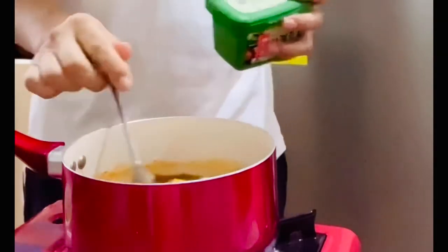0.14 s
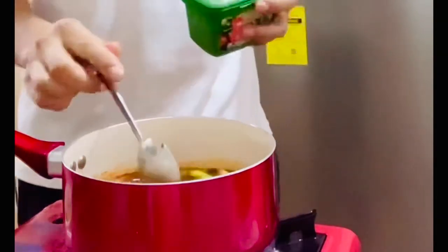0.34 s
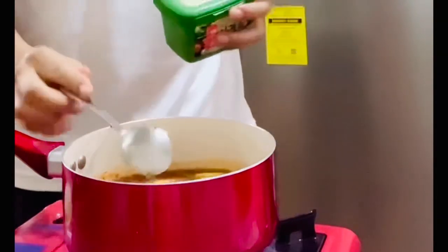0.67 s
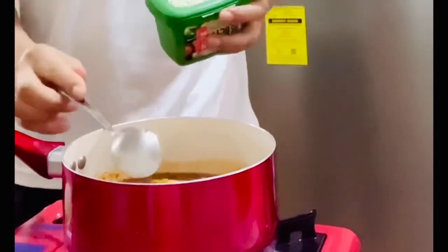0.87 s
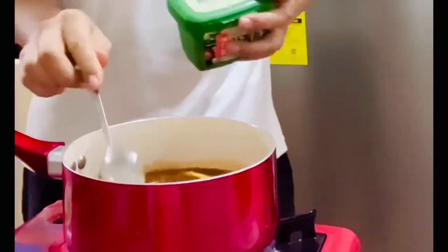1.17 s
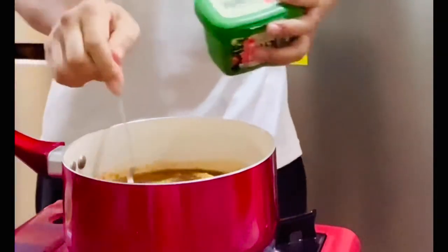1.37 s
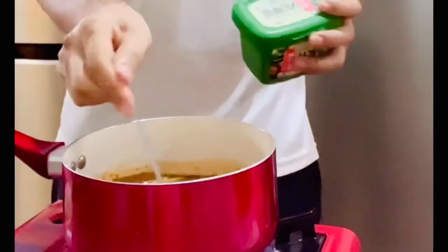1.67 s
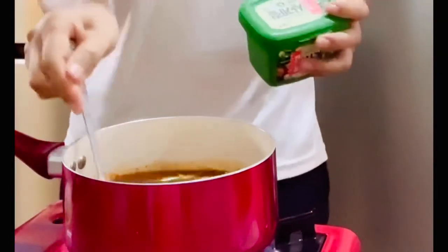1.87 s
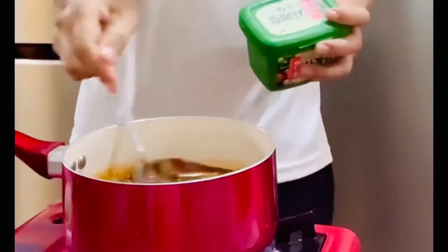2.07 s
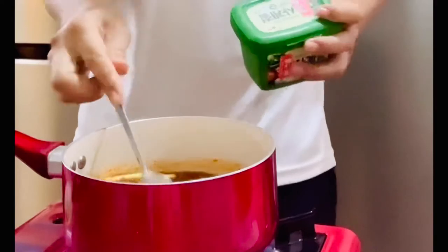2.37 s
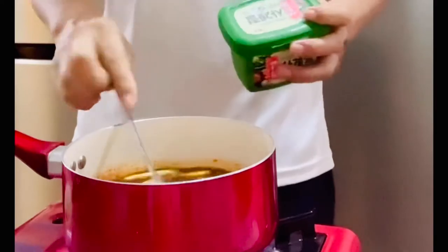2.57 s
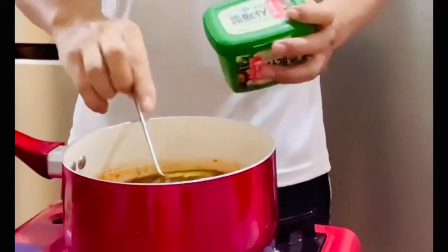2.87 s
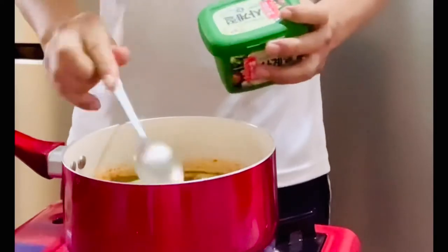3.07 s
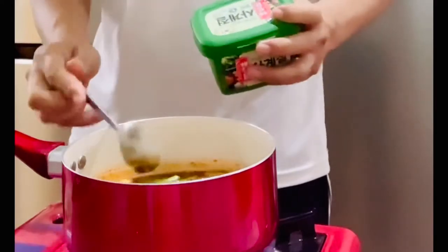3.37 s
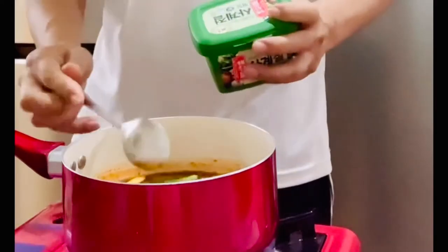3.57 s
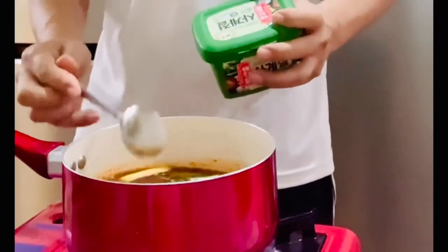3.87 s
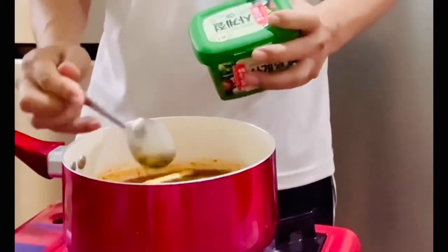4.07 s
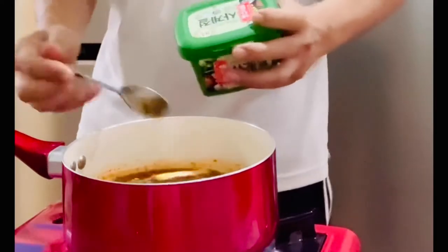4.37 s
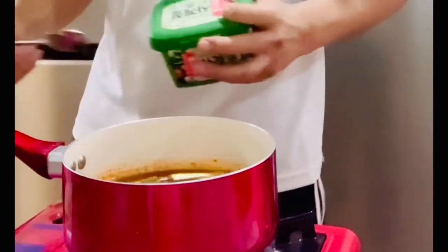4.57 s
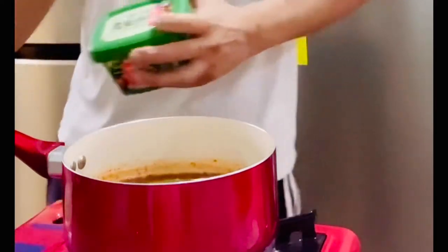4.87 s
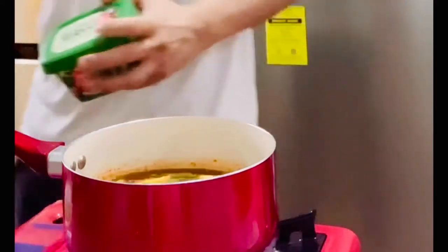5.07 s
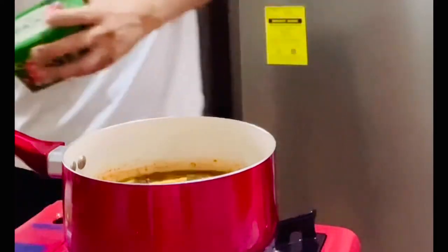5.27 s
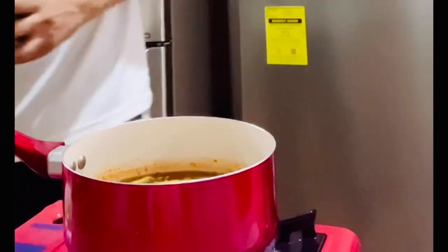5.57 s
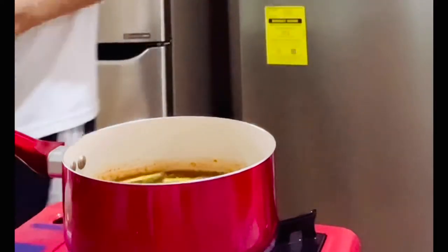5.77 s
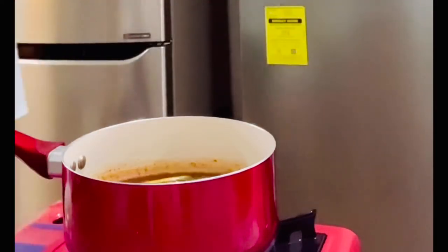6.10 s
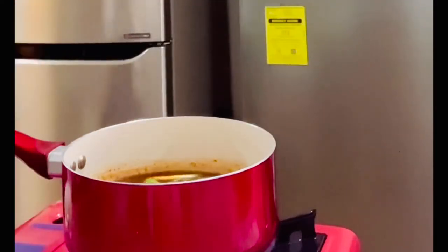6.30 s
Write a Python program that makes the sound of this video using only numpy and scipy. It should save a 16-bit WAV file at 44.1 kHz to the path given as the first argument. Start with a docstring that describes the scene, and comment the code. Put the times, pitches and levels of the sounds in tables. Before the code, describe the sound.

A steel spoon stirs broth and taps against a saucepan, then clatters down onto a kitchen counter and rattles to rest.

```python
"""A steel spoon stirs seasoning paste into a saucepan of broth in a small, hard-walled kitchen.
It clinks on the pan and rubs along the bottom while the broth plops and sizzles, then is tapped clean
six times. Put down on the counter, it bounces and rocks to rest. Each hit is a brief metal chatter plus
ringing modes. Rumble, hiss and mains hum lie underneath; a faint whine and one dull thump come late."""
import sys
import numpy as np
from scipy import signal
from scipy.fft import rfft, irfft, next_fast_len
from scipy.io import wavfile
from scipy.ndimage import uniform_filter1d

SR = 44100
rng = np.random.default_rng(int(sys.argv[2]) if len(sys.argv) > 2 else 0)


def master_out(mix):
    """Clip the mix to full scale and print it as 16-bit PCM to the path in sys.argv[1]."""
    frames = np.transpose(np.atleast_2d(mix))
    ceiling = np.clip(frames, -1, 1)
    pcm = np.round(ceiling * 32767).astype(np.int16)
    wavfile.write(sys.argv[1], SR, pcm)


N = 284004
TIME_S = np.arange(N) / SR
RING_TIME_S = TIME_S[:SR // 3]

# room echo: freq_hz, t60_s, level_db
ROOM_BANDS = [(100, 0.64, 1.5), (416, 0.26, 9), (1550, 0.4, 6.5), (3450, 0.43, 6), (8100, 0.37, 0.5),
              (15500, 0.39, -11)]
# left-right likeness of echo and of air: freq_hz, correlation
ECHO_LIKENESS = [(40, 0.2), (150, -0.029), (500, 0.79), (1000, -0.0099), (4000, -0.26), (7000, 0.51),
                 (12000, 0.91)]
AIR_LIKENESS = [(40, 0.89), (75, 0.96), (130, 0.76), (250, 0.44), (1000, 0.051), (4000, 0.033),
                (7000, 0.92), (12000, 1)]
# right microphone port behind the left: freq_hz, lag_rad
PORT_LAG = [(2000, 0), (3100, .8), (3900, 0), (4550, -.8), (6100, -.1), (7150, 3.14), (7540, 5.4),
            (8100, 7), (8900, 6.3), (11500, 6.3), (13100, 7.2), (15500, 8.7)]
# kitchen air: freq_hz, gain_db
RUMBLE_SPECTRUM = [(12, -49), (20, -10.5), (29, 1.5), (43, -9), (65, 0.5), (90, -18), (129, -6),
                   (258, -14.5), (293, -26), (332, -16.5), (549, -17), (967, -26), (1700, -30.5),
                   (2150, -30.5), (3000, -35.5), (3900, -26.5), (6600, -120)]
HISS_SPECTRUM = [(2000, -20), (3000, -3), (3900, -0.5), (5000, -0.5), (6400, -5), (7150, -2), (8200, -7.5),
                 (9500, 7.5), (11000, 1), (13200, -5), (15500, 0)]
# mains hum: freq_hz, level_db
HUM_TONES = [(60, -54.5), (120, -75)]
# whine: time_s, level_db
WHINE_ENVELOPE = [(5.3, -82), (5.45, -68), (5.72, -86), (6.05, -78), (6.15, -74), (6.26, -73),
                  (6.35, -69.5), (6.44, -67)]

# broth washing up the hot wall: start_s, level_db
SIZZLES = [(1.353, -53), (1.602, -61)]
# sizzle: freq_hz, gain_db
SIZZLE_SPECTRUM = [(1000, -12), (4000, 4), (8000, 5.5), (12000, -2), (14500, -1), (16000, -14)]
# bubbles: start_s, pitch_hz, level_db, broth_db
PLOPS = [(1.031, 776, -31.5, -8), (1.310, 863, -34, -15), (2.319, 783, -28, -21), (2.664, 870, -39, -24)]
# broth under a plop: freq_hz, gain_db, t60_s
BROTH_MODES = [(438, 2.5, 0.081), (273, -9, 0.087), (133, -0.5, 0.15)]
# spoon over the pan bottom: start_s, length_s, pressure_db, resonance_hz, rise_hz_per_s, grit_db
STROKES = [(1.301, 0.017, -47.5, 830, 300, -3), (1.33, 0.25, -55, 904, 50, 0),
           (1.595, 0.017, -56, 907, 400, 4.5), (1.624, 0.11, -56, 892, 404, 0),
           (1.772, 0.047, -55, 790, 900, 3), (1.828, 0.096, -45.5, 824, 1500, -5),
           (2.311, 0.012, -50.5, 797, 300, -1), (2.5, 0.075, -61, 967, 400, -11),
           (2.652, 0.0056, -55.5, 846, 300, -6)]
# resonances under the spoon: freq_hz, glide_share, width_hz, gain_db
RUB_MODES = [(470, .1, 90, -7), (900, 1, 115, -2), (1600, .3, 220, -10)]
# grit under the spoon: freq_hz, gain_db
GRIT_SPECTRUM = [(200, -73), (500, -3), (800, -7), (1300, -7), (2200, 2.5), (2800, -5.5), (3600, 2.5),
                 (5500, -15), (15000, -21)]

# spoon landing on the counter: start_s, level_db, counter_db, steel_db
LANDINGS = [(4.8382, -9.5, -10.5, -13), (4.8400, -9.5, -3.5, -4), (4.921, -15.5, -1.5, -3.5),
            (4.934, -19.5, -10, -9)]
# spoon tipping over: start_s, level_db, steel_db
SLAPS = [(4.948, -22, -12), (4.959, -22, -9), (5.053, -8.5, -7.5), (5.074, -9, -8.5), (5.081, -10, -4.5),
         (5.092, -10.5, -10), (5.099, -19, -2), (5.113, -19, -6), (5.133, -23, -14), (5.167, -13.5, -6),
         (5.186, -19.5, -6)]
# cracks on the counter: freq_hz, gain_db
LANDING_SPECTRUM = [(50, -17), (120, 1.5), (250, -11), (480, 6), (700, -7), (950, 0.5), (1400, -16),
                    (2100, 9), (2500, -5), (3100, -1.5), (3400, -1.5), (4200, 1.5), (5000, -3),
                    (6600, -5.5), (8000, -0.5), (9000, -1.5), (10500, -2), (13300, 0), (14500, 12),
                    (15600, 5.5), (16000, -21)]
ROCK_SPECTRUM = [(90, -5.5), (230, -10.5), (370, -2.5), (750, -10.5), (1350, -14), (2200, -3.5), (3100, -3),
                 (4500, -0.5), (5500, -17), (6100, -13), (7100, -7.5), (8200, -13), (10000, -14),
                 (15500, -14)]
# counter top: freq_hz, gain_db, t60_s
COUNTER_MODES = [(129.6, -27, 0.3), (455, -20, 0.07), (520, -23, 0.1), (2010, -19, 0.11), (2110, -14, 0.05),
                 (3030, -15, 0.05)]
# free spoon, by the side it lands on: freq_hz, on_edge_db, on_bowl_db, t60_s
SPOON_MODES = [(2735, -29, -21, .08), (3058, -13, -17, .05), (3545, -25, -18, .07), (3900, -22, -20, .05),
               (4484, -19, -17, .1), (4670, -24, -22, .13), (6130, -27, -29, .15), (6955, -26, -21, .13),
               (7540, -16, -26, .15), (8091, -15, -16, .15), (8205, -23, -21, .15), (8892, -18, -20, .18),
               (11175, -19, -19, .21), (11552, -24, -23, .24), (12550, -16, -22, .3),
               (13104, -23, -19, .22), (14260, -11, -17, .19), (14326, -13, -19, .22),
               (15470, -8, -27, .09)]

# held spoon hitting the pan: start_s, level_db, bowl_hz, bowl_db, edge_hz, edge_db,
# body_db, tilt_db_per_octave, hollow_db, hard_db, tick_db
TAPS = [(0.267, -34.5, 3880, -17, 5200, -17, -1.5, 1, 0, -3, 6),
        (0.383, -23, 3870, -8, 5230, -8.5, -3, -0.5, 1.5, 3.5, 2.5),
        (0.620, -20.5, 3800, -1.5, 4830, -2, -3, -0.5, 7, 7.5, 9),
        (0.659, -31, 3670, -4, 5650, -8, 0.5, -2, 10, -8, 6),
        (2.320, -32.5, 3900, -30, 4500, -24, -9, -1.5, 4, -1, -9),
        (2.927, -20.5, 3890, -4.5, 4620, -5.5, -1.5, 0.5, -2, 3, 7),
        (3.166, -21, 4005, 6, 5490, 4.5, 1, 1, 3, -7, 13.5),
        (3.369, -20, 4010, 5, 5340, -9.5, 1.5, 1, 2, -9, 1),
        (3.574, -17.5, 3995, 1, 4620, -7, -1, 0.3, 1.5, -9, 2.5),
        (3.7713, -16, 3954, 2, 4370, -6.5, -0.5, 1.6, 0.5, 0.5, 9.5),
        (3.959, -18, 3970, -0.5, 5530, -8.5, -3, -0.1, -3.5, 1, 5.5),
        (3.976, -30, 3960, 0, 5550, -12, -8, -1, -5, 0, 12)]
# first touch and crack of a tap: freq_hz, gain_db
TICK_SPECTRUM = [(1900, -14), (7000, -1.5), (9300, -0.5), (10700, -8), (12900, -4.5), (13900, 1),
                 (16000, -13.5)]
TAP_SPECTRUM = [(70, -32.5), (200, -5), (300, 2), (600, 7), (720, -8), (820, 6.5), (1060, -1.5),
                (1230, 3.5), (1430, -9), (1850, 4.5), (2130, 4.5), (2300, -0.5), (2500, 2), (2650, -7.5),
                (2900, 1.5), (3800, -5), (5000, -10), (5400, -17), (7000, -12), (8500, -11), (10800, -6.5),
                (14000, -16), (16000, -43)]
# held spoon's edge: pitch_ratio, gain_db
EDGE_SPECTRUM = [(.6, -45), (.74, -22), (.79, -6), (.84, -4), (.9, -22), (.97, -3), (1, 1), (1.05, -4),
                 (1.1, -9), (1.15, -4), (1.21, -18), (1.4, -45)]
# held spoon's bowl: pitch_ratio, gain_db, t60_s
BOWL_MODES = [(1, 0, .022), (1.002, -18, .15), (.974, -22, .11)]
# pan full of broth: freq_hz, gain_db, t60_s
PAN_MODES = [(130, -23, .23), (185, -30, .1), (279, -21, .17), (345, -24, .06), (430, -25, .1),
             (485, -25, .13), (556, -24, .09), (824, -25, .03), (1210, -23, .025), (2080, -24, .02),
             (2950, -25, .02), (3640, -27, .05)]


def from_db(db):
    """Decibels to gain."""
    return 10 ** (np.asarray(db) / 20)


def unit_rms(x):
    """Scale to unit rms."""
    return x / np.sqrt(np.mean(x ** 2) + 1e-20)


def at_hz(points, hz):
    """Read a table on a log-frequency axis."""
    f, value = np.transpose(points)
    return np.interp(np.log(np.maximum(hz, 1)), np.log(f), value)


def add(track, start_s, sound):
    """Mix a sound into a track."""
    start = int(start_s * SR)
    track[start:start + len(sound)] += sound[:N - start]


def min_phase(x, gain):
    """Causal filter with the given gain per frequency bin."""
    size = 2 * (gain.shape[-1] - 1)
    cepstrum = irfft(np.log(gain))[..., :size // 2]
    cepstrum[..., 1:] *= 2
    return irfft(rfft(x, size) * np.exp(rfft(cepstrum, size)))[..., :x.shape[-1]]


def colour(x, spectrum, tilt_db_per_octave=0):
    """Tilted filter of unit power gain."""
    size = 2 * next_fast_len(x.shape[-1] // 2 + 2048)
    hz = np.arange(size // 2 + 1) * SR / size
    tilted = [(f, db + tilt_db_per_octave * np.log2(f)) for f, db in spectrum]
    return min_phase(x, unit_rms(from_db(at_hz(tilted, hz))))


def flatten(x, fine_hz, broad_hz):
    """Level a noise burst's chance peaks and holes, so it has no pitch."""
    size = 2 * next_fast_len(x.shape[-1])
    power = np.abs(rfft(x, size)) ** 2
    fine, broad = (uniform_filter1d(power, int(hz * size / SR)) + 1e-12 for hz in (fine_hz, broad_hz))
    return min_phase(x, np.sqrt(broad / fine))


def stereo_noise(likeness, size):
    """White noise pair, correlation set per frequency."""
    mid, side = rfft(rng.standard_normal((2, size)))
    alike = np.clip(at_hz(likeness, np.arange(len(mid)) * SR / size), -1, 1)
    return irfft(np.sqrt(1 + alike) * mid + np.sqrt(1 - alike) * side * [[1], [-1]], size)


def wander(turns_per_s):
    """Random curve, unit rms."""
    turns = rng.standard_normal(int(TIME_S[-1] * turns_per_s) + 2)
    return unit_rms(np.interp(TIME_S * turns_per_s, np.arange(len(turns)), turns))


def resonance(x, hz, width_hz):
    """Movable resonance: a low-pass around a turning phase, unit rms."""
    carrier = np.exp(2j * np.pi * np.cumsum(hz) / SR)
    pole = np.exp(-np.pi * width_hz / SR)
    baseband = signal.lfilter([1], [1, -2 * pole, pole ** 2], x / carrier)
    return unit_rms((baseband * carrier).imag)


def ring(modes, spread_db=2, detune=0):
    """Decaying sines of alternating sign; level and pitch can scatter per blow."""
    scatter = rng.uniform(-1.06, 1, (len(modes), 2))
    out = 0
    for k, ((hz, db, t60_s), (louder, sharper)) in enumerate(zip(modes, scatter)):
        envelope = from_db(db + spread_db * louder - 60 * RING_TIME_S / t60_s)
        out += (-1) ** k * envelope * np.sin(2 * np.pi * hz * (1 + detune * sharper) * RING_TIME_S)
    return out


def crack(spectrum, decay_s, tilt_db_per_octave=0):
    """Metal chatters for a few milliseconds on contact."""
    t = TIME_S[:SR // 20]
    burst = rng.standard_normal(len(t)) * np.sqrt(t) * np.exp(-t / decay_s)
    chatter = flatten(burst, fine_hz=450, broad_hz=8000)
    return colour(chatter / np.linalg.norm(chatter), spectrum, tilt_db_per_octave)


def kitchen_echo(build_s=0.0018, wall_s=0.034, wall_db=-15):
    """Dense reflections dying band by band, plus one slap from a far wall."""
    t = TIME_S[:int(SR * .7)]
    noise = rfft(stereo_noise(ECHO_LIKENESS, len(t)))
    hz = np.arange(len(t) // 2 + 1) * SR / len(t)
    echo = 0
    for band, (_, t60_s, db) in enumerate(ROOM_BANDS):
        share = at_hz([(row[0], k == band) for k, row in enumerate(ROOM_BANDS)], hz)
        fade = from_db(-60 * t / t60_s) * (1 - np.exp(-(t / build_s) ** 2))
        echo += from_db(db) * irfft(noise * share, len(t)) * fade / np.linalg.norm(fade) / np.sqrt(2)
    echo[:, int(wall_s * SR)] += from_db(wall_db)
    return echo


def place(x, echo, wet_db, treble_left_db, split_hz=1200):
    """Direct sound plus room, with the treble panned."""
    paths = from_db(wet_db) * echo
    paths[:, 0] += 1
    stereo = signal.fftconvolve(x[None], flatten(paths, fine_hz=70, broad_hz=700), axes=1)[:, :N]
    bass = signal.sosfilt(signal.butter(1, split_hz, fs=SR, output="sos"), stereo)
    return bass + (stereo - bass) * from_db([[treble_left_db / 2], [-treble_left_db / 2]])


def whine(start_hz=1975, sag_hz_per_s=300, width_hz=25):
    """Narrow noise band sliding down; fades and returns."""
    times_s, levels_db = np.transpose(WHINE_ENVELOPE)
    age_s = TIME_S - times_s[0]
    envelope = (age_s > 0) * from_db(np.interp(TIME_S, times_s, levels_db))
    return envelope * resonance(rng.standard_normal(N), start_hz - sag_hz_per_s * age_s, width_hz)


def background(rumble_db=-52, hiss_db=-62.5):
    """Rumble, hiss, mains hum and whine, slightly left."""
    rumble = from_db(rumble_db) * unit_rms(colour(stereo_noise(AIR_LIKENESS, N), RUMBLE_SPECTRUM))
    hiss = from_db(hiss_db) * unit_rms(colour(stereo_noise(AIR_LIKENESS, N), HISS_SPECTRUM))
    hum = sum(from_db(db) * np.sin(2 * np.pi * hz * TIME_S) for hz, db in HUM_TONES)
    return (rumble + hiss + hum + whine()) * from_db([[.7], [-.7]])


def thump(start_s=6.039, pitch_hz=79, level_db=-45.5, t60_s=0.65, attack_s=0.0034):
    """One soft, low blow."""
    out = np.zeros(N)
    add(out, start_s, ring([(pitch_hz, level_db, t60_s)]) * (1 - np.exp(-RING_TIME_S / attack_s)))
    return out


def sizzles(grain_db=3, fade_db_per_s=78):
    """Broth fizzes on the hot wall, fading as the patch dries."""
    envelope = sum((TIME_S > s) * from_db(db - fade_db_per_s * np.abs(TIME_S - s)) for s, db in SIZZLES)
    grains = rng.standard_normal(N) * from_db(grain_db * rng.exponential(1, N))
    return envelope * unit_rms(colour(grains, SIZZLE_SPECTRUM))


def plops(attack_s=0.0019, bubble_t60_s=0.02):
    """A bubble rings briefly; the broth answers lower down."""
    out = np.zeros(N)
    for start_s, hz, db, broth_db in PLOPS:
        plop = ring([(hz, 0, bubble_t60_s)]) + from_db(broth_db) * ring(BROTH_MODES)
        add(out, start_s, from_db(db) * plop * (1 - np.exp(-RING_TIME_S / attack_s)))
    return out


def rubbing(slips_per_s=2500, grain_db=1.5, flutter_per_s=45, flutter_db=2.5, waver_share=.018,
            swell_share=0.84, release_db_per_s=309, grit_gain_db=-2.3, ring_gain_db=1):
    """The spoon catches and slides; tiny slips excite grit and resonances that rise along each stroke."""
    pressure = grit_level = rings = 0
    main_hz = rest_hz = RUB_MODES[1][0]
    for start_s, length_s, db, hz, rise_hz_per_s, grit_db in STROKES:
        t = TIME_S - start_s
        swell = np.clip(t / (swell_share * length_s), 0, 1) ** .5
        stroke = swell * from_db(db - release_db_per_s * np.clip(t - length_s, 0, 1))
        pressure += stroke
        grit_level += stroke * from_db(grit_db)
        main_hz = np.where(t < 0, main_hz, hz + rise_hz_per_s * np.minimum(t, .5))
    flutter = from_db(flutter_db * wander(flutter_per_s))
    slips = flutter * (rng.random(N) < slips_per_s / SR) * rng.standard_normal(N)
    slips *= from_db(grain_db * np.minimum(rng.exponential(1, N), 3))
    for hz, glide_share, width_hz, db in RUB_MODES:
        waver = 1 + waver_share * wander(flutter_per_s)
        rings += from_db(db) * resonance(slips, (hz + glide_share * (main_hz - rest_hz)) * waver, width_hz)
    grit = grit_level * unit_rms(colour(slips, GRIT_SPECTRUM))
    return from_db(grit_gain_db) * grit + from_db(ring_gain_db) * pressure * rings


def landing(crack_gain_db=14, counter_gain_db=-5, steel_gain_db=-1):
    """The spoon hits the counter with bowl and handle, then bounces once."""
    knocks, steel = np.zeros((2, N))
    modes = [(hz, on_edge_db, t60_s) for hz, on_edge_db, _, t60_s in SPOON_MODES]
    for start_s, db, counter_db, steel_db in LANDINGS:
        add(knocks, start_s, from_db(db + crack_gain_db) * crack(LANDING_SPECTRUM, decay_s=0.0023))
        add(knocks, start_s, from_db(db + counter_db + counter_gain_db) * ring(COUNTER_MODES))
        add(steel, start_s, from_db(db + steel_db + steel_gain_db) * ring(modes, detune=.0016))
    return knocks, steel


def rocking(start_s=5.066, count=17, gap_s=.0097, gap_ratio=0.92, touch_db=-19.5, fade_db_per_s=67,
            uneven_db=5, ring_db=-14, ring_fade_db_per_s=161, crack_gain_db=7.5, steel_gain_db=0.5):
    """The spoon slaps the counter and rocks on its bowl, touches growing quicker and weaker."""
    early, strength = rng.uniform(-1, 1, (2, count))
    gaps_s = gap_s * gap_ratio ** np.arange(count)
    age_s = np.cumsum(gaps_s) - gaps_s * (1 + early / 4)
    knocks_db = touch_db - fade_db_per_s * age_s + uneven_db * strength
    rings_db = ring_db - ring_fade_db_per_s * age_s
    touches = list(zip(start_s + age_s, knocks_db, rings_db))
    slaps = [(hit_s, db, db + steel_db) for hit_s, db, steel_db in SLAPS]
    modes = [(hz, on_bowl_db, t60_s) for hz, _, on_bowl_db, t60_s in SPOON_MODES]
    knocks, steel = np.zeros((2, N))
    for hit_s, db, steel_db in slaps + touches:
        add(knocks, hit_s, from_db(db + crack_gain_db) * crack(ROCK_SPECTRUM, decay_s=0.0015))
        lag_s = rng.uniform(0, .0004)
        add(steel, hit_s + lag_s, from_db(steel_db + steel_gain_db) * ring(modes, detune=.0016))
    return knocks, steel


def ticks(gain_db=2):
    """First touch of steel on the pan: a very bright click."""
    out = np.zeros(N)
    for start_s, db, *_, tick_db in TAPS:
        add(out, start_s, from_db(db + tick_db + gain_db) * crack(TICK_SPECTRUM, decay_s=0.0011))
    return out


def clinks(bowl_lag_s=0.00076, edge_gain_db=12):
    """The spoon's bowl and edge ring, soon damped by the hand."""
    out = np.zeros(N)
    for start_s, db, bowl_hz, bowl_db, edge_hz, edge_db, *_ in TAPS:
        bowl = ring([(ratio * bowl_hz, gain_db, t60_s) for ratio, gain_db, t60_s in BOWL_MODES])
        edge = crack([(ratio * edge_hz, gain_db) for ratio, gain_db in EDGE_SPECTRUM], decay_s=0.0022)
        add(out, start_s + bowl_lag_s, from_db(db + bowl_db) * bowl)
        add(out, start_s, from_db(db + edge_db + edge_gain_db) * edge)
    return out


def pan_taps(crack_gain_db=9.5, chatter_s=0.0018, hollow_hz=1240, hard_hz=3000, hump_octaves=.22,
             body_below_hz=1000, body_lag_s=.0007, slosh_detune=.012):
    """A crack coloured by the spot hit, then a dull knock from the pan, retuned by sloshing broth."""
    out = np.zeros(N)
    freqs_hz, base_db = np.transpose(TAP_SPECTRUM)
    hollow, hard = (np.exp(-(np.log2(freqs_hz / hz) / hump_octaves) ** 2) for hz in (hollow_hz, hard_hz))
    for start_s, db, *_, body_db, tilt_db_per_octave, hollow_db, hard_db, _ in TAPS:
        modes = [(hz, gain_db + body_db * (hz < body_below_hz), t60_s) for hz, gain_db, t60_s in PAN_MODES]
        knock = ring(modes, spread_db=5, detune=slosh_detune)
        spot = list(zip(freqs_hz, base_db + hollow_db * hollow + hard_db * hard))
        add(out, start_s, from_db(db + crack_gain_db) * crack(spot, chatter_s, tilt_db_per_octave))
        add(out, start_s + body_lag_s, from_db(db) * knock)
    return out


def scene():
    """Pan and counter in one room, mostly a little left."""
    echo = kitchen_echo()
    pan = place(pan_taps(), echo, wet_db=2, treble_left_db=1)
    pan += place(clinks(), echo, wet_db=-2.5, treble_left_db=8)
    pan += place(ticks(), echo, wet_db=-1.5, treble_left_db=-0.3)
    pan += place(rubbing() + sizzles() + plops() + thump(), echo, wet_db=-3.5, treble_left_db=0)
    drop, drop_ring = landing()
    rattle, rattle_ring = rocking()
    counter = place(drop, echo, wet_db=0, treble_left_db=1.5)
    counter += place(rattle, echo, wet_db=-0.95, treble_left_db=3)
    counter += place(drop_ring + rattle_ring, echo, wet_db=-8, treble_left_db=-0.5)
    return pan + counter + background()


def record(dry):
    """The microphone's two ports differ in treble phase; steep low-pass at 16 kHz."""
    lag_rad = at_hz(PORT_LAG, np.arange(N // 2 + 1) * SR / N)
    right = irfft(rfft(dry[1]) * np.exp(-1j * lag_rad), N)
    lowpass = signal.ellip(10, .2, 80, 16000, fs=SR, output="sos")
    return signal.sosfilt(lowpass, np.array([dry[0], right]))


dry = scene()
out = record(dry)
master_out(out)
```